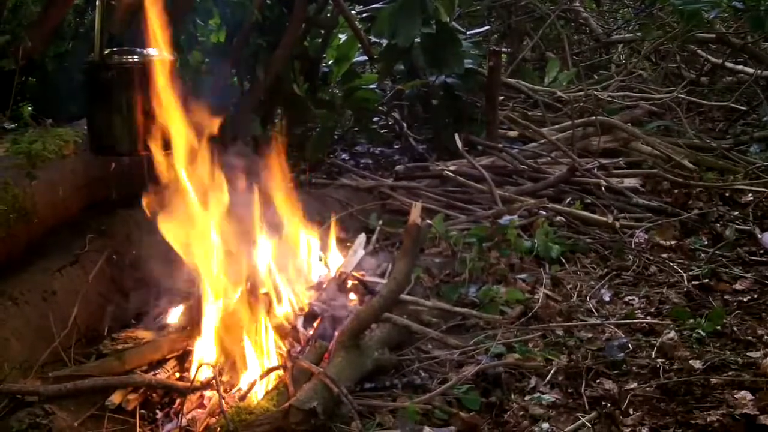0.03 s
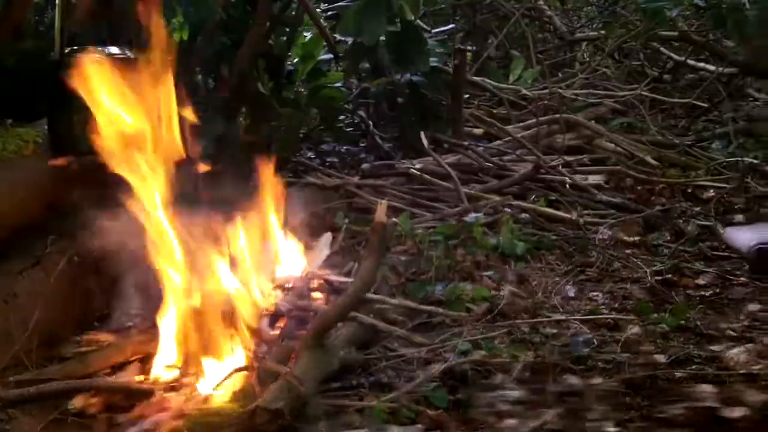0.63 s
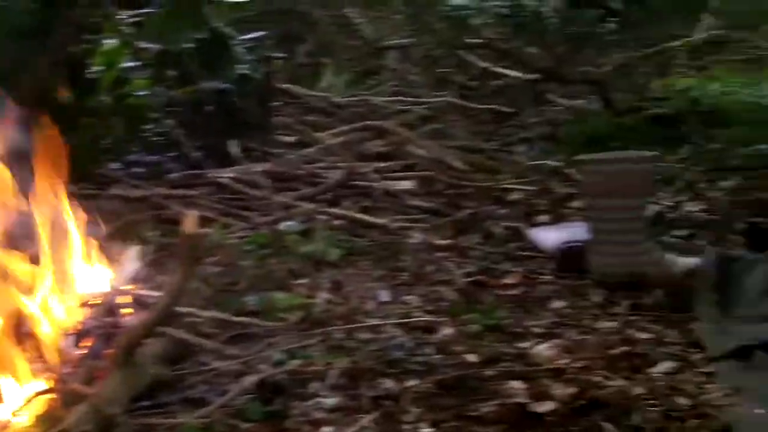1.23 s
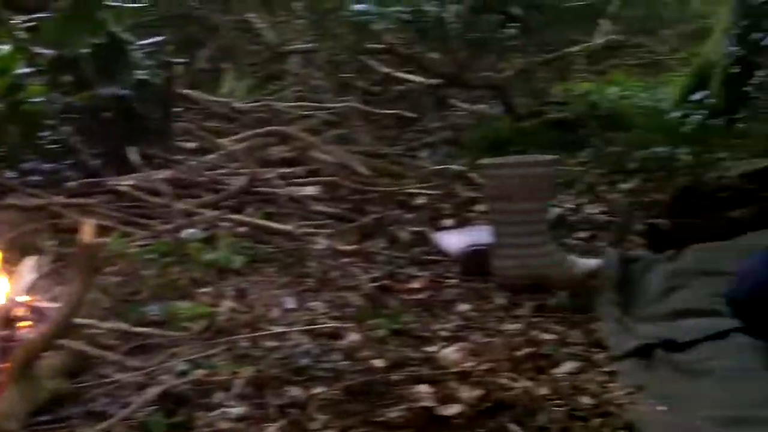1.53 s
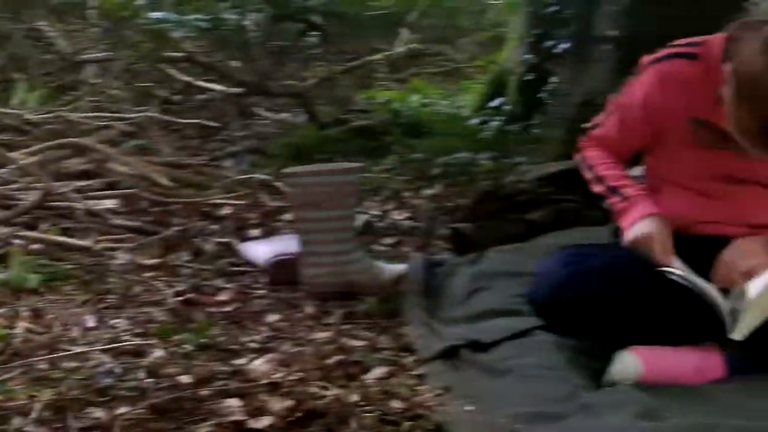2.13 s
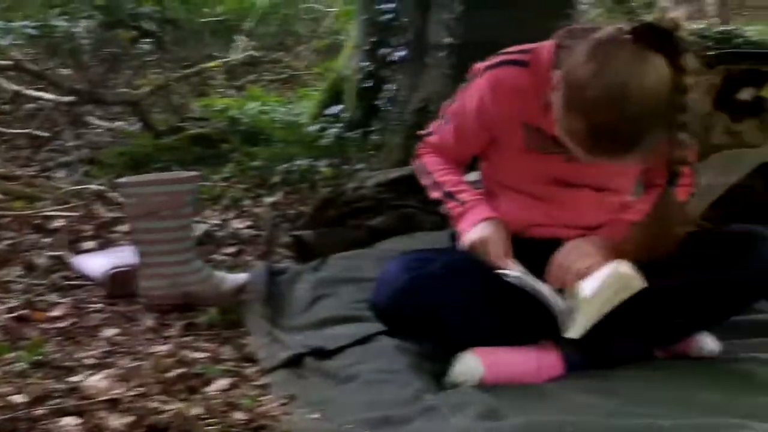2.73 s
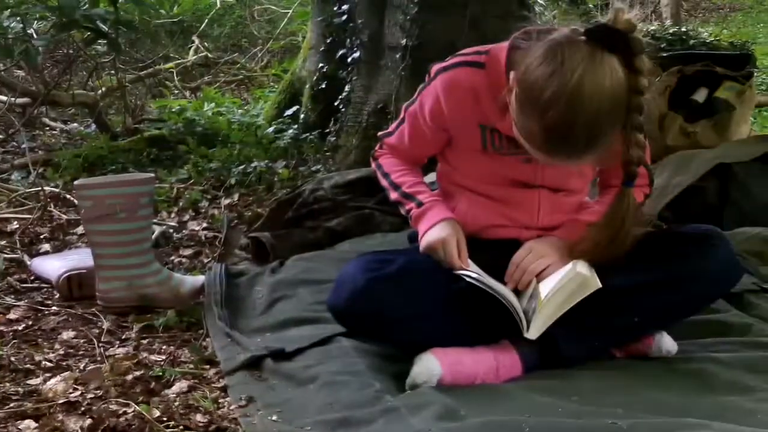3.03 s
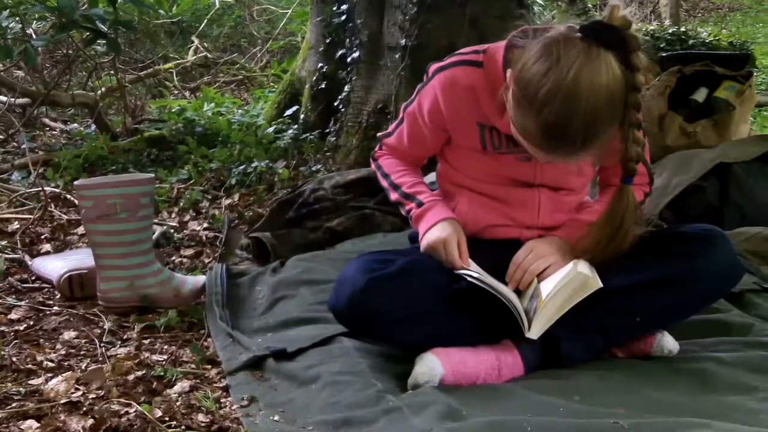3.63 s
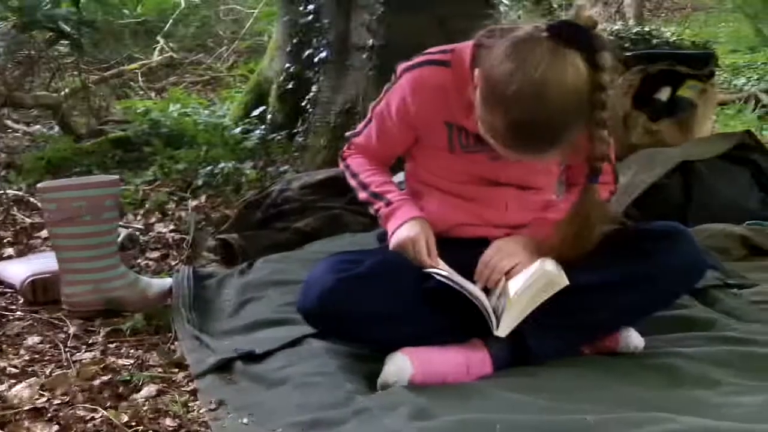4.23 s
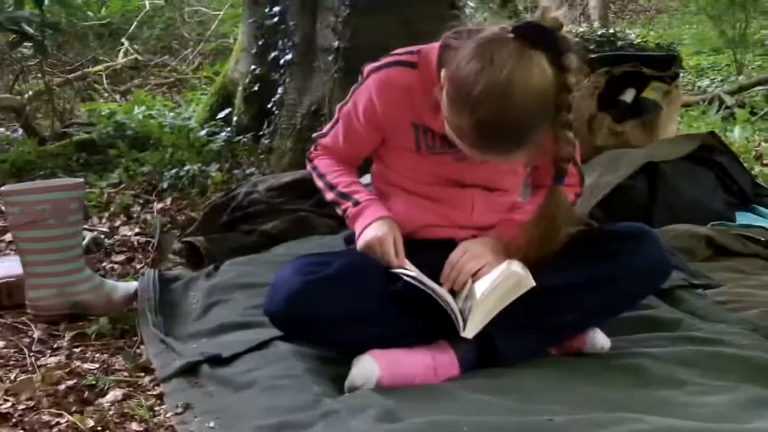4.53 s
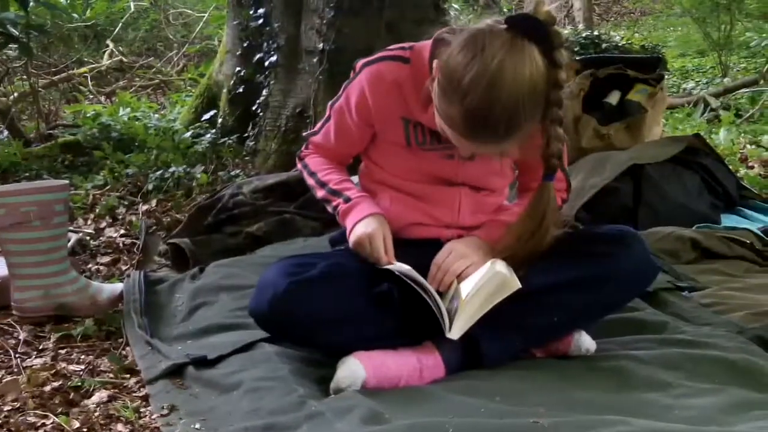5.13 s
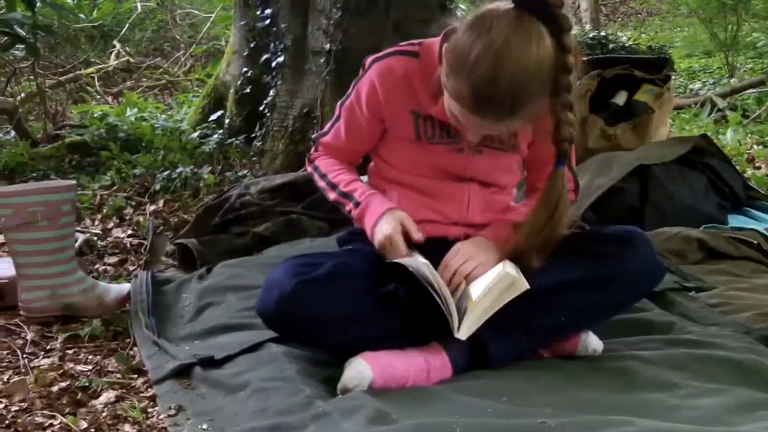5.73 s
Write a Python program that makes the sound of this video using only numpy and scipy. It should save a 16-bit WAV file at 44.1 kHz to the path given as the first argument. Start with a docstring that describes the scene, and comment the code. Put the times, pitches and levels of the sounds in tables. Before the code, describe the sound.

A small wood fire flutters quietly and low throughout, over a faint woodland hush and a wavering drone like a far-off engine. A songbird sings three clear phrases of fluted, gliding, warbled notes, from about 0.3 to 1.9 seconds, 2.6 to 3.5 and 4.3 to 5.1, softly echoed by the trees. A smaller bird adds thin high whistles, with a run of falling notes from 0.8 to 1.6 seconds and a much fainter one from 4.5 to 5.5. The fire gives two loud, sharp pops at about 0.6 and 1.5 seconds, then only faint scattered ticks until just after 5 seconds. Three dull, hollow bumps sound close to the microphone, at 0.5, 4.0 and 4.3 seconds, standing out above the background. From about 5.4 seconds to the end at 6, a distant bird twitters faintly.

```python
"""A thrush sings three fluted phrases of frequency-modulated glides among trees, and a tit answers
with thin whistles and falling trills. A small wood fire flutters as its gas burns and pops as its
cells burst; three dull bumps sound close to the microphone. Scattering by the trunks gives birds
and pops a soft echo. A low distant drone lies underneath, and a far bird twitters at the end."""
import sys
import numpy as np
from scipy import signal
from scipy.fft import rfft, irfft, next_fast_len
from scipy.io import wavfile
from scipy.ndimage import uniform_filter1d, map_coordinates

SR = 44100
rng = np.random.default_rng(int(sys.argv[2]) if len(sys.argv) > 2 else 0)


def to_wav(sig):
    """Store sig (one row per channel, or 1-D mono) as 16-bit WAV at the path in sys.argv[1].

    Samples outside -1..1 are clipped; the rate is SR.
    """
    pcm = np.clip(np.atleast_2d(sig), -1, 1) * 32767
    pcm = np.round(pcm).astype(np.int16)
    wavfile.write(sys.argv[1], SR, pcm.T)  # frames by channels


N = 263718
T = np.arange(N) / SR


def amp(db):
    return 10 ** (np.asarray(db) / 20)


def along(points, hz):
    """Interpolation of (Hz, value) points on a logarithmic frequency axis."""
    f, v = np.transpose(points)
    return np.interp(np.log(hz + 1), np.log(f + 1), v)


def wobble(rate, size=N):
    """Smooth random modulation: a spline through rate knots a second."""
    knots = rng.standard_normal(int(size * rate / SR) + 4)
    return map_coordinates(knots, [np.arange(size) * rate / SR])


def add(track, s, x):
    """Superposition of x on the track from s seconds."""
    start = max(round(s * SR), 0)
    track[start:start + len(x)] += x[:max(N - start, 0)]


def filtered(x, response):
    """Linear filtering: the spectrum is multiplied by a frequency response."""
    m = next_fast_len(N + SR // 2)
    return irfft(rfft(x, m) * response(np.fft.rfftfreq(m, 1 / SR)), m)[:N]


def noise(spectrum):
    """Spectral shaping of white noise, scaled to rms 1."""
    x = filtered(rng.standard_normal(N), lambda hz: amp(along(spectrum, hz)))
    return x / np.sqrt(np.mean(x ** 2))


def impulse(spectrum, tilt_db, size=4096):
    """The minimum-phase pulse of a spectrum tilted by tilt_db per octave, with peak 1."""
    hz = np.fft.rfftfreq(size, 1 / SR)
    cepstrum = irfft(np.log(amp(along(spectrum, hz) + tilt_db * np.log2(hz + 1))))
    causal = 2 * cepstrum[:size // 2] * (np.arange(size // 2) > 0)
    pulse = irfft(np.exp(rfft(causal, size)))
    return pulse / np.abs(pulse).max()


# Flame spectrum. Each row: frequency in Hz, relative density in dB.
FLAME_SPECTRUM = [(15, -3.5), (28, -1.5), (42, 5.5), (62, 3), (78, -0.5), (130, -9), (220, -18), (400, -31),
                  (900, -32), (3000, -86)]

def flames(level_db=-47.5, gust_db=2):
    """Combustion noise: unsteadily burning gas radiates a low flutter."""
    return amp(level_db + gust_db * wobble(13)) * noise(FLAME_SPECTRUM)


def hum(hz, db, waver, swell_db):
    """A low tone under slow random frequency and amplitude modulation."""
    phase = 2 * np.pi * np.cumsum(hz * (1 + waver * wobble(14))) / SR
    return np.sqrt(2) * amp(db + swell_db * wobble(11)) * np.sin(phase)


# Spectrum of the far hush. Each row: frequency in Hz, relative density in dB.
HUSH_SPECTRUM = [(30, 1.5), (200, 2.5), (310, 4.5), (460, -3.5), (700, 0.5), (1050, 3.5), (1400, -2.5),
                 (2200, -6.5), (3200, -11.5), (4500, -13.5), (6000, -16.5), (7200, -26.5), (11000, -21),
                 (15000, -26)]
# Envelope of the drone. Each row: time in seconds, level in dB.
DRONE_LEVELS = [(0, -51), (.4, -43), (.85, -46), (1.38, -39.5), (1.65, -55), (2.25, -53), (2.85, -42),
                (3.75, -54), (4.45, -48), (4.9, -64), (5.98, -58)]

def distant_drone(start_hz=44.1, rise_hz_per_s=4.1, hush_db=-55):
    """A climbing tone and a higher hum, like a far-off engine, superposed on broadband noise."""
    drone_db = np.interp(T, *np.transpose(DRONE_LEVELS))
    drone = hum(start_hz + rise_hz_per_s * T, drone_db, waver=.035, swell_db=1)
    hush = amp(hush_db + .25 * wobble(2.88)) * noise(HUSH_SPECTRUM)
    return hush + drone + hum(hz=109, db=-57, waver=.018, swell_db=4)


def whistle(hz, db, edge_s=.0068, waver=.0045):
    """A soft-ended sinusoid whose phase is the integral of a slightly unsteady frequency."""
    t = np.arange(len(hz)) / SR
    phase = 2 * np.pi * np.cumsum(hz * (1 + waver * wobble(255.7, len(hz)))) / SR
    gate = np.sin(np.pi / 2 * np.clip(np.minimum(t, t[-1] - t) / edge_s, 0, 1)) ** 2
    return np.sqrt(2) * amp(db) * gate * np.sin(phase)


# Reverberation of the wood. Each row: frequency in Hz, time to decay by 60 dB in seconds.
DECAY_TIMES = [(100, 0.52), (1000, 0.21), (2600, 0.76), (6000, 0.86), (12000, 0.36)]

def trees(x, wet_db, build_s=.0022, trunk_db=-12, trunks=8):
    """Scattering: early reflections from near trunks and a diffuse tail follow the direct sound."""
    hz, t, spectra = signal.stft(rng.standard_normal(SR), SR, nperseg=256)
    decay = amp(-60 * t / along(DECAY_TIMES, hz)[:, None])
    tail = signal.istft(spectra * decay * (1 - np.exp(-t / build_s)), SR, nperseg=256)[1]
    tail /= np.linalg.norm(tail)
    tail[rng.integers(SR // 300, SR // 25, trunks)] += amp(trunk_db) * rng.choice([-1, 1], trunks)
    path = amp(wet_db) * tail
    path[0] += 1  # the direct sound
    return signal.fftconvolve(x, path / np.linalg.norm(path))


# The tit's whistles. Each row: start and length in seconds, first and last pitch in Hz,
# level in dB, rasp as a fraction of the pitch.
TIT_WHISTLES = [(0, 0.074, 5350, 5110, -54.5, .028), (0.097, 0.21, 6820, 6600, -68, .014),
                (0.439, .13, 7520, 7380, -64.5, .006), (0.644, .1, 5580, 5056, -48, .008),
                (1.695, 0.098, 7200, 7000, -70.5, .02), (1.933, .05, 4580, 4400, -57, .035),
                (3.77, 0.091, 6500, 6200, -76, .01), (4.346, 0.087, 5540, 5480, -63.5, .006)]
# One syllable, a held top note and a plunge. Each row: time in seconds, pitch as a fraction
# of the top note, gain in dB.
TIT_SYLLABLE = [(0, .975, 5), (.025, .995, -10), (.047, 1.005, -4.5), (.062, .87, 2.5), (.078, .73, 0),
                (.096, .635, -1)]
# Its trills. Each row: start in seconds, syllables per second, syllable count, top note in Hz,
# base level in dB, extra gain of the top note in dB.
TIT_TRILLS = [(0.777, 7.3, 6, 6430, -51, -2), (4.45, 8.25, 9, 5770, -64.5, -10)]

def tit():
    """Frequency sweeps, roughened by random modulation: sagging whistles and repeated plunges."""
    song = np.zeros(N)
    for s, length, start_hz, end_hz, db, rasp in TIT_WHISTLES:
        hz = np.geomspace(start_hz, end_hz, int(length * SR))
        add(song, s, trees(whistle(hz, db, edge_s=.03, waver=rasp), wet_db=2.5))
    pitch_ratio, shape_db = contour(TIT_SYLLABLE)
    on_top_note = uniform_filter1d(1. * (pitch_ratio > .95), size=400)
    for s, rate, count, top_hz, db, top_db in TIT_TRILLS:
        for k in range(round(count)):
            syllable = whistle(top_hz * pitch_ratio, db + shape_db + top_db * on_top_note, waver=.0113)
            add(song, s + k / rate, trees(syllable, wet_db=4))
    return song


def contour(rows):
    """Linear interpolation, sample by sample, of each column after the time."""
    s, *columns = np.transpose(rows)
    t = np.arange(s[0], s[-1], 1 / SR)
    return [np.interp(t, s, column) for column in columns]


def warbled(hz, db, depth_hz, warble_hz, uneven=.3, throb_db=3):
    """Fast, uneven frequency and amplitude modulation spreads a note into sidebands."""
    rate = warble_hz * np.exp(uneven * wobble(80, len(hz)))
    warble = np.sin(2 * np.pi * np.cumsum(rate) / SR)
    shake_db = throb_db * wobble(66.8, len(hz)) * np.tanh(depth_hz / 60)
    return whistle(hz + depth_hz * warble, db + shake_db)


# The thrush's notes. Each row: start and length in seconds, first and last pitch in Hz, bow of
# the middle in Hz, base level in dB, swell from start to end in dB, warble depth in Hz.
THRUSH_NOTES = [ (0.256, 0.044, 2397, 1973, 324, -45.5, 10, 95), (.29, 0.061, 2300, 3150, -3, -42, -3, 132),
                (.35, .04, 3000, 2407, 0, -38.5, 14, 85), (0.449, 0.092, 3054, 2413, -40, -39, 14, 64),
                (0.633, 0.07, 2520, 2520, 83, -39, 5, 11), (0.706, 0.078, 2482, 2049, 34, -35.5, -4.5, 58),
                (0.816, 0.13, 2776, 2672, -41, -38.5, 2, 79), (1.088, .16, 2574, 2455, 1, -52.5, -1, 366),
                (1.371, .165, 2490, 2778, -80, -43, 6, 92), (1.55, 0.067, 2233, 2113, -2, -44.5, -8, 80),
                (1.726, 0.074, 3580, 3850, -400, -55.5, 7, 76), (1.779, 0.081, 2650, 2526, 3, -50, 6, 11),
                (2.628, 0.076, 2930, 2440, -2.5, -43.5, 16, 72),
                (2.707, 0.085, 2406, 2110, -0.5, -38.5, -4.5, 134),
                (2.832, 0.07, 2615, 2206, 3, -45.5, -8, 440), (2.899, 0.08, 2352, 2427, 29.5, -38, -6, 66),
                (3.068, 0.077, 3044, 2854, -1, -45.5, 5, 93), (3.139, .068, 2851, 2600, -21, -36, 0, 39),
                (3.298, 0.044, 2687, 2510, 1, -43, -3, 60), (3.351, 0.09, 2613, 2606, 110, -38, -3.5, 75),
                (3.434, 0.09, 2716, 3113, 1.5, -45, -1, 97), (4.292, .074, 2990, 2630, -450, -43.5, 10, 64),
                (4.357, .13, 2535, 2080, 389, -37, 6.5, 44), (4.487, 0.035, 2420, 2088, 3, -37.5, 4, 76),
                (4.536, 0.052, 2130, 2433, 57, -39.5, -14, 40), (4.645, 0.061, 3050, 2687, 1, -41, 14, 110),
                (4.706, 0.053, 2680, 1937, -130, -38, -13, 48), (4.788, 0.081, 2495, 2910, -90, -40, 1, 60),
                (4.946, 0.065, 2345, 2329, 40, -37, -2, 11), (5.005, 0.069, 2250, 2326, -71, -43, 4, 13),
                (5.063, .068, 2390, 2882, 100.5, -42.5, -6, 60)]

def thrush(gain_db=1, taper_db=4):
    """Frequency modulation: each fluted note warbles along a parabolic glide as it swells or fades."""
    song = np.zeros(N)
    for s, length, start_hz, end_hz, bow_hz, db, swell_db, depth_hz in THRUSH_NOTES:
        progress = np.linspace(0, 1, int(length * SR))
        arch = 1 - (2 * progress - 1) ** 2
        hz = start_hz + (end_hz - start_hz) * progress + bow_hz * arch
        level_db = gain_db + db + swell_db * (progress - .5) - taper_db * (1 - arch)
        add(song, s, trees(warbled(hz, level_db, depth_hz, warble_hz=85), wet_db=-4))
    return song


# Resonances of a thud. Each row: frequency in Hz, relative level in dB.
THUD_SPECTRUM = [(25, -33), (110, -10.5), (205, 0.5), (250, -3.5), (330, 4), (420, -3.5), (520, -25.5),
                 (640, -8), (760, -20), (880, -21), (1200, -34.5), (1800, -54), (5000, -65)]
# Close knocks. Each row: start in seconds, peak of the thud in dB, tilt in dB per octave.
KNOCKS = [(0.5059, -14.5, -3), (4.037, -14.5, 0), (4.3479, -18, -1)]

def bumps(sway_hz=46, sway_db=-20, sway_rise_s=.02):
    """Impact excitation: a knock and its brief clatter drive hollow resonances, over a low sway."""
    out, t = np.zeros(N), np.arange(SR // 5) / SR
    swell = t / sway_rise_s * np.exp(1 - t / sway_rise_s)
    sway = amp(sway_db) * swell * np.sin(2 * np.pi * sway_hz * t)
    for s, db, tilt_db in KNOCKS:
        force = amp(-38.5) * np.exp(-t / .015) * rng.standard_normal(len(t))  # the clatter
        force[0] = 1  # the knock
        thud = signal.fftconvolve(force, impulse(THUD_SPECTRUM, tilt_db))[:len(t)]
        add(out, s, amp(db) * (thud / np.abs(thud).max() + sway))
    return out


# Spectra of cracking wood and of steam. Each row: frequency in Hz, relative level in dB.
CRACK_SPECTRUM = [(100, -4), (600, -19), (1000, -7.5), (1600, -2.5), (2800, 0), (3600, -1.5), (4400, 2.5),
                  (5600, -6.5), (7000, -14.5), (9000, -48), (12500, -31), (15000, -44)]
STEAM_SPECTRUM = [(1000, -21), (4000, -9), (7000, 3), (12500, 1), (15000, -14)]
# Bursting wood cells. Each row: start in seconds, gain in dB, tearing time in seconds,
# tilt in dB per octave, pitch of the gas pocket in Hz, relative steam level in dB.
CELL_BURSTS = [(0.5785, -7.5, 0.0023, -1, 2820, -58), (1.5428, -7.5, 0.018, 2, 2240, -35.5),
               (1.9822, -35, 0.018, 3, 2670, -28), (2.501, -38.5, 0.02, 2, 3270, -31),
               (2.98, -49, .004, 1, 4200, -34), (4.037, -39.5, 0.011, -4.5, 3600, -46),
               (4.8452, -46, .004, 3, 4000, -35), (5.1012, -40, 0.0024, 2, 4574, -36),
               (5.1475, -34.5, 0.0017, 1.5, 5400, -30)]

def pops(tear_db=-17, ground_db=-40, ground_delay_s=.017, pocket_db=-5, decay_cycles=1.64):
    """Sudden pressure release: a cell bursts, its gas pocket resonates, fibres tear and steam spits."""
    out, t = np.zeros(N), np.arange(SR // 10) / SR
    hiss = noise(STEAM_SPECTRUM)
    log_echo = amp(-29) * np.exp(-t / .004)
    ground_echo = amp(ground_db) * np.exp(-np.abs(t - ground_delay_s) / .0079)
    for s, db, tearing_s, tilt_db, pocket_hz, steam_db in CELL_BURSTS:
        fibres = amp(tear_db - 60 * t / tearing_s)
        force = (fibres + log_echo + ground_echo) * rng.standard_normal(len(t))
        force[0] = 1  # the burst itself is a single shock
        force /= np.linalg.norm(force)
        crack = signal.fftconvolve(force, impulse(CRACK_SPECTRUM, tilt_db))[:len(t)]
        cycles = pocket_hz * t
        pocket = amp(pocket_db) * np.sin(2 * np.pi * cycles) * np.exp(-cycles / decay_cycles)
        steam = amp(steam_db) * np.exp(-t / .0063) * hiss[round(s * SR):][:len(t)]
        add(out, s, trees(amp(db) * (crack + pocket + steam), wet_db=-22))
    return out


# A far bird's call. Each row: time in seconds, pitch in Hz, level in dB, warble depth in Hz.
FAR_CALL = [(5.42, 4226, -63.5, 251), (5.6, 4070, -75, 300), (5.76, 4110, -67.5, 350),
            (5.98, 4300, -70, 447)]

def twitter():
    """A third bird sings beyond the critical distance, where echo outweighs direct sound."""
    song = np.zeros(N)
    call = warbled(*contour(FAR_CALL), warble_hz=40.1)
    add(song, FAR_CALL[0][0], trees(call, wet_db=1))
    return song


def scene():
    """Linear superposition of all sources in one channel."""
    return (thrush() + tit() + twitter() + pops() + bumps() + flames() + distant_drone())[None]


def record(dry, notch_hz=8000, notch_width_hz=600, top_hz=15300):
    """The microphone's frequency response has a narrow treble notch and a band limit."""
    def response(hz):
        detuning = notch_hz ** 2 - hz ** 2
        return detuning / (detuning + 2j * hz * notch_width_hz) * (hz < top_hz)
    return filtered(dry[0], response)[None]


dry = scene()
out = record(dry)
to_wav(out)
```